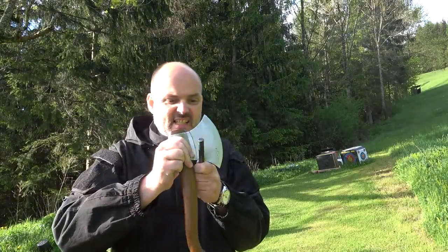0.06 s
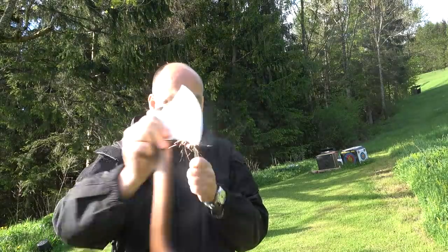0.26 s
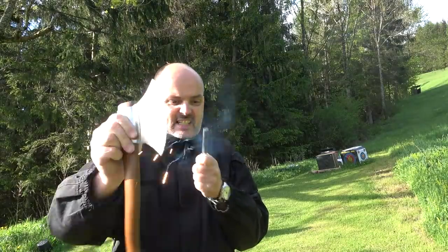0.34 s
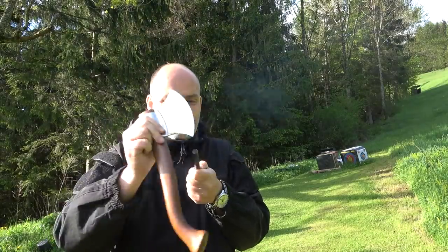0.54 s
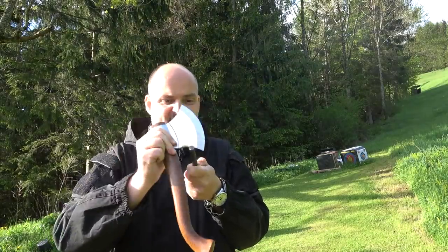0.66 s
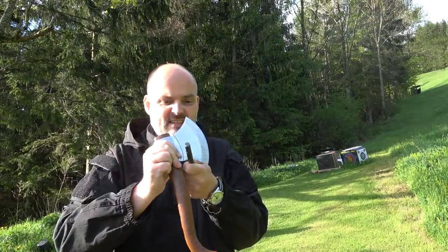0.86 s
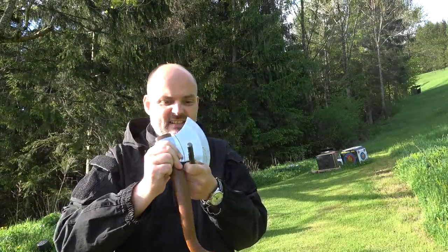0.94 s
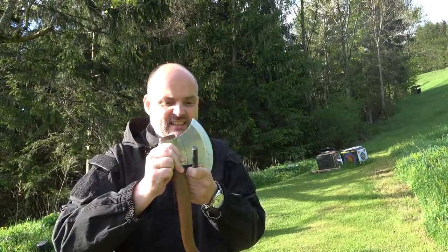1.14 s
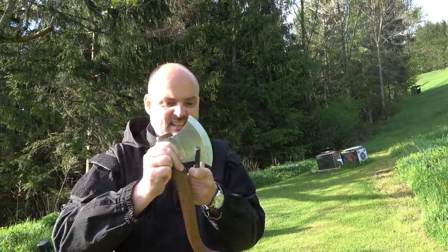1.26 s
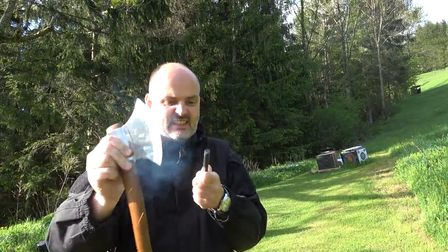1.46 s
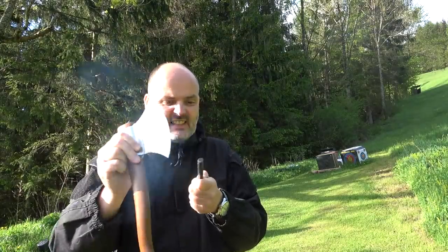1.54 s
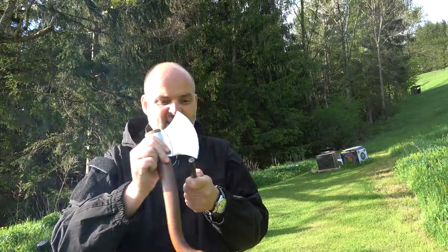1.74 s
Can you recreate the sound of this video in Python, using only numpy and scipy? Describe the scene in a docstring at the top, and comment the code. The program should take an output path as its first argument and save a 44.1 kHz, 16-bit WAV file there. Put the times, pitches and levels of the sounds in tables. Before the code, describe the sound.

A spark rod is scraped sharply along a hatchet's steel edge twice, with a lighter metallic clink between; sparks fizz and pop, the head rings on, and soft wind rumbles at a fairly close outdoor microphone.

```python
"""Outdoors, a spark rod is scraped twice along the steel edge of a hatchet head; between strokes it taps the edge.
The edge stutters and rasps: random slips and sharp jolts drive the resonances of the pressed head and the rod.
Sparks fizz and pop as filtered noise and crackle, and the freed head rings in fading sines and one long tone.
Wind rumbles on the microphone over a faint wash of trees, with soft rustles and puffs, all filtered noise."""
import sys
import numpy as np
from scipy import signal
from scipy.fft import rfft, irfft
from scipy.io import wavfile
from scipy.ndimage import uniform_filter1d

SR = 44100
rng = np.random.default_rng(int(sys.argv[2]) if len(sys.argv) > 2 else 0)


def pcm_store(signal):
    """Save signal as 16-bit PCM."""
    levels = np.round(np.clip(np.atleast_2d(signal), -1, 1) * 32767)
    wavfile.write(sys.argv[1], SR, levels.astype(np.int16).T)


N = 79380  # samples: 1.8 s

# How the rod meets the edge over time. Each row: time in seconds, place along the stroke (about 1 at its start,
# 0 at its end), brightness of the rasp in dB per octave, level of the low part of the spark fizz in dB.
CONTACT = [(0, 1.3, 2, -10), (.19, 0.98, 1, -7), (.24, .4, -0.5, -16), (.265, .01, 2.5, -5),
           (.3, .01, -4.1, -4.7), (.34, .01, -0.5, -1), (.45, .01, 10, 5), (1.1, 0.6, -6, -10),
           (1.29, 0.53, 1, 4), (1.32, 0.17, 4.5, -6), (1.365, .01, -6.5, -5.5), (1.39, 0.011, 0.5, -1.3),
           (1.8, .01, -2, -3)]


def gain_of(db):
    """Turns decibels into a plain multiplier."""
    return 10 ** (np.asarray(db) / 20)


def evened(x):
    """Brings a sound to an average (RMS) strength of 1."""
    return x / np.sqrt(np.mean(x ** 2) + 1e-20)


def add(mix, s, sound):
    """Adds a sound into the mix at s seconds, cut off at the end of the mix."""
    part = mix[round(s * SR):][:len(sound)]
    part += sound[:len(part)]


def curve(rows, column, quiet=-120):
    """Joins one column of a table by straight lines over time; outside its rows it holds the value quiet."""
    rows = np.array(rows)
    return np.interp(np.arange(N) / SR, rows[:, 0], rows[:, column], quiet, quiet)


def colour(x, points):
    """Filters a sound by a spectrum of (Hz, dB) points, then brings it to strength 1."""
    point_hz, db = np.transpose(points)
    hz = np.fft.rfftfreq(len(x), 1 / SR)
    gain = gain_of(np.interp(np.log(hz + 1), np.log(point_hz + 1), db))
    return evened(irfft(rfft(x) * gain, len(x)))


def resonate(x, hz, width):
    """A resonance of gain 1 that can follow a pitch curve: shift down to 0 Hz, smooth, shift back up."""
    turn = np.exp(2j * np.pi * np.cumsum(hz * np.ones(len(x))) / SR)
    r = np.exp(-np.pi * width / SR)
    smooth = signal.lfilter([1 - r], [1, -r], x / turn + 1e-18)
    return 2 * (turn * smooth).real


def clicks(per_s, spread_db):
    """Random clicks of both signs, a few of them large."""
    chance, size, sign = rng.random((3, N))
    heights = gain_of(spread_db * np.minimum(-np.log(size + 1e-9), 4))
    return evened((chance < per_s / SR) * np.sign(sign - .5) * heights)


def outdoors():
    """Steady wash, lumpy wind and soft rustles: noise, each shaped by its own spectrum and level curve."""
    # Spectrum of the wash of trees. Each row: frequency in Hz, relative level in dB.
    wash_spectrum = [(150, -36), (250, -4), (429, -5.5), (651, -6.5), (1080, -8), (1500, -13),
                     (3280, -11.5), (3770, -9), (5070, -22.5), (13000, -26.5), (16000, -26)]
    # Spectrum of the wind on the microphone. Each row: frequency in Hz, relative level in dB.
    wind_spectrum = [(12, -12), (20, -4.5), (74, 2.5), (145, -5.5), (217, -17.5), (367, -23.5), (409, -25),
                     (500, -20.5), (650, -45), (1100, -120)]
    # Strength of the wind. Each row: time in seconds, level in dB.
    gusts = [(0.0, -58), (0.27, -48.5), (0.324, -60), (0.344, -42), (0.536, -51.5), (0.596, -37),
             (0.68, -45), (0.936, -42.5), (0.952, -46.5), (1.368, -37), (1.584, -45), (1.8, -40.5)]
    # Sleeve rustles and soft low puffs. Each row: middle in seconds, length in seconds, centre in Hz,
    # width in Hz, level in dB.
    rustles = [(0.5, 0.45, 1640, 880, -50), (1.063, 0.49, 1130, 740, -52), (1.526, 0.13, 1160, 1800, -49),
               (.32, 0.059, 170.5, 43, -36), (0.247, 0.097, 530, 160, -39.5),
               (1.017, 0.58, 285, 107, -54.5), (0.56, 0.061, 250, 120, -69)]
    wash_db = -54
    t = np.arange(N) / SR
    # slow random ups and downs, mostly below 14 Hz, shared by wash and wind
    lumps = evened(colour(rng.standard_normal(N), [(0, 0), (5, 0), (14, -40)]))
    wash = colour(rng.standard_normal(N), [(60, -37)] + wash_spectrum + [(20000, -36)])
    out = gain_of(wash_db + .5 * lumps) * wash
    # the last point leaves a faint floor of -47 dB above 900 Hz
    wind = colour(rng.standard_normal(N), [(8, -36)] + wind_spectrum + [(900, -47)])
    out += gain_of(curve(gusts, 1, -50) + 0.85 * lumps) * wind
    for mid, length, hz, width, db in rustles:
        swell = np.cos(np.pi * np.clip((t - mid) / length, -.5, .5))
        rustle = evened(resonate(resonate(rng.standard_normal(N), hz, width), hz, width))
        out += gain_of(db) * swell * rustle
    return out


def pressed(x, tilt_db=0):
    """The head damped by the rod; some resonances sink as the contact moves, and all wander with the pressure."""
    # Head resonances while the rod presses on it. Each row: frequency in Hz, width in Hz, relative level in dB,
    # share of the pitch by which it sinks along a stroke.
    modes = [(437, 65, -9.5, 0), (594, 104, -11.5, 0.0059), (774, 170, -7.5, 0), (931, 56, -1, 0.018),
             (1137, 28, -6.5, 0.014), (1492, 45, -5, 0), (1624, 44, -4.5, 0.023), (1917, 115, -2, 0),
             (2531, 124, 2.5, 0.083), (3304, 99, -12.5, 0.049), (3938, 72, 1.5, 0.043),
             (4837, 94, -11, 0.063), (5150, 160, -18.5, 0), (6180, 58, -8, 0), (6653, 93, -7, 0.0056),
             (9040, 140, -15, 0.026), (10000, 98, -22, 0), (11750, 130, -35, 0), (14450, 140, -23, 0)]
    grit_db = -21.5  # level of the bare contact sound
    wander = .012  # share of the pitch
    skirt = 6.7  # second filter of each resonance, in widths of the first
    place = curve(CONTACT, 1)
    out = gain_of(grit_db) * x
    for k, (f, width, db, sink) in enumerate(modes):
        drift = uniform_filter1d(uniform_filter1d(rng.standard_normal(N), size=700), size=700)
        hz = f * (1 + sink * place + wander * evened(drift))
        push = x * gain_of(tilt_db * np.log2(f / 2560))  # brightness of the push, pivoting at 2560 Hz
        ring = resonate(resonate(push, hz, width), hz, skirt * width)
        # signs alternate; narrow resonances are lifted because they let less through
        out = out + (-1) ** k * gain_of(db) * ring / np.sqrt(16 * width / SR)
    return out


def catches():
    """Sharp jolts with a short rebound into the pressed head, each favouring one region of pitch."""
    # Hard catches and light touches of the rod on the edge. Each row: time in seconds, relative level in dB,
    # favoured frequency in Hz, spread in octaves.
    touches = [(.128, -36, 2500, 1.5), (.178, -38, 4000, 2.9), (.19, -25, 4500, 1),
               (0.199, -20.5, 2000, 1.3), (.21, -22.5, 2500, 1.3), (.226, -13.5, 3020, 0.74),
               (0.237, -16, 4000, 0.76), (.245, -6.5, 3120, 0.41), (0.255, -3, 2000, 0.65),
               (.259, -1.5, 1180, 0.54), (0.2626, 6, 1460, 0.31), (0.266, -13, 1480, 0.16),
               (.268, -9, 1200, 1.34), (1.169, -25.5, 5070, 1.06), (1.295, -15, 4040, 0.42),
               (1.307, -11.5, 6450, 0.77), (1.317, -2, 3180, 0.47), (1.337, -9, 2200, 1.1),
               (1.339, -7.5, 4000, .4), (1.348, -21, 1480, 0.33), (1.36, -7, 1370, 0.71),
               (1.365, -9, 1590, 0.48), (1.28, -36, 2500, 1.3)]
    rebound_s = .004  # time for the rebound to fall by 60 dB
    force = np.zeros(N)
    hz = np.fft.rfftfreq(512, 1 / SR) + 1
    t = np.arange(1, 200) / SR
    grits = rng.standard_normal((len(touches), 199))
    for (s, db, top_hz, spread), grit in zip(touches, grits):
        jolt = irfft(gain_of(db - 6 * (np.log2(hz / top_hz) / spread) ** 2), 512)
        rebound = .2 * grit * gain_of(-60 * t / rebound_s)
        # the jolt is centred in its 512 samples, so it starts 256 samples early
        add(force, s - 256 / SR, 4 * np.convolve(np.roll(jolt, 256), np.r_[1, rebound]))
    return pressed(force)


def pops():
    """Spark pops and dry ticks: noise bursts without their lows that die away within milliseconds."""
    # Each row: start in seconds, starting level in dB, time to fall by 60 dB in seconds, low edge in Hz.
    ticks = [(.128, -40.5, 0.0074, 1190), (.334, -30, .01, 3000), (.346, -44, .008, 6000),
             (.353, -41, .01, 6000), (.364, -48, 0.0071, 9000), (0.3755, -15, 0.0072, 900),
             (0.379, -32, .025, 2000), (.323, -13, 0.0067, 2980), (.388, -36, .01, 5000),
             (.397, -49, .01, 9000), (.443, -48, .01, 6000), (.487, -51, 0.0071, 7000),
             (.494, -37, .008, 7000), (0.5, -35, 0.01, 7000), (.518, -50, 0.0074, 6000),
             (.529, -36, .008, 6000), (.552, -46, 0.009, 8000), (.6, -46, .008, 6000),
             (.667, -44, .008, 9000), (1.068, -43.5, 0.0074, 3500), (1.389, -26, .008, 3000),
             (1.437, -21, 0.017, 4900), (1.445, -18.5, .012, 2500), (1.485, -55, .01, 5970),
             (1.69, -46, .01, 6000)]
    out, t = np.zeros(N), np.arange(1200) / SR
    bursts = rng.standard_normal((len(ticks), 1200))
    for (s, db, t60, low_hz), burst in zip(ticks, bursts):
        highpass = signal.butter(2, low_hz, "high", fs=SR)
        add(out, s, signal.lfilter(*highpass, gain_of(db - 60 * t / t60) * burst))
    return out


def scrape(rows):
    """Uneven slips ring the pressed head and the rod, whose note rises as it slides off."""
    slips = clicks(per_s=1300, spread_db=2)
    rod_width_hz = 197
    hz = curve(rows, 2, 1000)
    rod_push = slips * gain_of(curve(rows, 3))
    rod = resonate(resonate(rod_push, hz, rod_width_hz), hz, 2 * rod_width_hz)
    rasp = pressed(slips * gain_of(curve(rows, 1)), curve(CONTACT, 2))
    return rasp + rod / np.sqrt(np.pi * rod_width_hz / SR)


def fizz(rows):
    """Burning sparks: hiss mixed with crackle, thin until the shower is in the air."""
    # Spectrum of the fizz. Each row: frequency in Hz, relative level in dB.
    spectrum = [(120, -40), (200, -17), (1740, -13), (1910, -5.5), (2330, -20), (3760, -4.5), (4520, -17.5),
                (14100, -18.5), (16000, -26)]
    hiss_share, split_hz = .6, 4300
    crackle = clicks(per_s=2500, spread_db=3.5)
    x = colour(hiss_share * rng.standard_normal(N) + (1 - hiss_share) * crackle, spectrum)
    # the part below the split has its own level over time
    body = signal.filtfilt(*signal.butter(2, split_hz, fs=SR), x)
    return (x - body + body * gain_of(curve(CONTACT, 3))) * gain_of(curve(rows, 4))


def blows():
    """Each blow knocks, then rings the free modes, wavering as the head turns, until a touch muffles them."""
    # Free modes of the head besides the long tone. Each row: frequency in Hz, relative level in dB,
    # time to fall by 60 dB in seconds.
    modes = [(413.8, -16, .2), (477, -14.5, 0.052), (688, -22.5, 0.11), (969, -17, 0.17),
             (1355, -1.5, 0.055), (1740, -47, 0.071), (2550, -10, 0.056), (3755, 0.5, 0.21),
             (4040, -22, 0.17), (4440, -18, .03), (4790, -11.5, 0.031), (6260, -33, .4), (6540, -30.5, .3),
             (8960, -29.5, 0.17), (9900, -31, .08), (14490, -34, .08)]
    # Blows that set the head ringing. Each row: start in seconds, ring level in dB, brightness in dB per octave,
    # knock level in dB, ringing time before the muffling in seconds, pitch ratio, rise in seconds.
    hits = [(.268, -28, -5, -38, .3, 1.002, .004), (.8335, -23.5, -0.5, -25.5, 0.14, 1, 0.0005),
            (1.365, -14, 2, -45, 0.12, 1.004, 0.0041), (0.83, -49, 7, -60, 0.049, 0.94, 0.0011)]
    muffle_s, waver_db = 0.016, 2.5
    out, t = np.zeros(N), np.arange(SR // 2) / SR
    bandpass = signal.butter(5, [380, 4700], "band", fs=SR)
    noises = rng.standard_normal((len(hits), SR // 2))
    for (s, db, tilt_db, knock_db, hold, tune, rise), noise in zip(hits, noises):
        ring = 0
        for (hz, mode_db, t60), (speed, phase) in zip(modes, rng.random((len(modes), 2))):
            # 15 to 40 wavers per second, setting in over 23 ms
            waver = waver_db * np.sin(2 * np.pi * ((15 + 25 * speed) * t + phase)) * np.minimum(t / 0.023, 1)
            level_db = db + mode_db + tilt_db * np.log2(hz / 3770) - 60 * t / t60 + waver
            ring = ring + gain_of(level_db) * np.sin(2 * np.pi * hz * tune * t)
        knock = signal.lfilter(*bandpass, noise) * gain_of(knock_db - 60 * t / .04)
        muffle = np.clip((hold - t) / muffle_s, 0, 1)
        add(out, s, np.minimum(t / rise, 1) * (ring * muffle + knock))
    return out


def tone(rows):
    """The long-lived mode of the head: one sine whose pitch and level follow a table."""
    level = uniform_filter1d(gain_of(curve(rows, 2)), size=90)
    return np.sqrt(2) * level * np.sin(2 * np.pi * np.cumsum(curve(rows, 1, 1910)) / SR)


def scene():
    """Adds up the strokes, catches, blows, long tones, pops and the outdoors."""
    # One list for each stroke. Each row: time in seconds, rasp level in dB, rod resonance in Hz,
    # rod level in dB, spark fizz level in dB.
    strokes = [
        [(.175, -51, 780, -77, -70), (.2, -30.5, 860, -42, -44), (.225, -30, 930, -33, -34),
         (.245, -25.5, 885, -30, -32), (.256, -21.5, 990, -18, -38), (.267, -18.5, 1010, -14, -40),
         (.275, -25.5, 980, -22.5, -23.5), (.29, -30.5, 980, -59, -26), (.32, -43, 1580, -63, -21),
         (.331, -41, 1550, -65, -24.5), (.339, -36, 1540, -70, -37), (.365, -59, 1550, -80, -50),
         (.4, -82, 1550, -82, -52.5), (.62, -90, 1550, -90, -60.5)],
        [(1.265, -56, 750, -54, -79), (1.29, -34, 760, -68, -55), (1.312, -27, 800, -36.5, -33.5),
         (1.33, -22, 812, -19.5, -39), (1.348, -21, 930, -30.5, -34), (1.362, -30, 1470, -18, -22.5),
         (1.372, -27.5, 1590, -39, -22), (1.39, -38, 1550, -50, -21.5), (1.425, -40, 1550, -55, -28.5),
         (1.432, -60, 1550, -60, -30.5), (1.442, -55, 1550, -65, -22), (1.462, -64, 1550, -75, -45.5),
         (1.6, -69, 1600, -95, -63)],
    ]
    # The long tone, wavering as the head swings, one list for each time it rings.
    # Each row: time in seconds, pitch in Hz, level in dB.
    long_tones = [
        [(0.268, 1895, -25), (0.282, 1932, -18.5), (0.296, 1927, -14.5), (0.382, 1904, -27),
         (0.432, 1909, -22.5), (0.47, 1902, -29), (0.564, 1909, -28.5), (0.628, 1906, -36.5),
         (0.826, 1910, -42.5), (0.833, 1882, -45)],
        [(0.836, 1900, -28), (0.926, 1915, -37), (0.938, 1895, -36.5), (0.97, 2020, -66)],
        [(1.364, 1916, -44), (1.37, 1923, -21), (1.376, 1924, -19.5), (1.398, 1918, -18), (1.418, 1919, -27),
         (1.502, 1906, -28), (1.544, 1906, -34.5), (1.644, 1910, -32), (1.746, 1905, -44), (1.8, 1910, -44)],
    ]
    metal = sum(scrape(rows) + fizz(rows) for rows in strokes) + catches() + blows()
    metal = metal + sum(tone(rows) for rows in long_tones)
    return (metal + pops() + outdoors())[None]


def record(dry):
    """The band limit of the recorder: a steep filter that removes what lies above about 16 kHz."""
    lowpass = signal.firwin(511, 16000, window=("kaiser", 9), fs=SR)
    return signal.oaconvolve(dry, lowpass[None], "same")


dry = scene()
out = record(dry)
pcm_store(out)
```